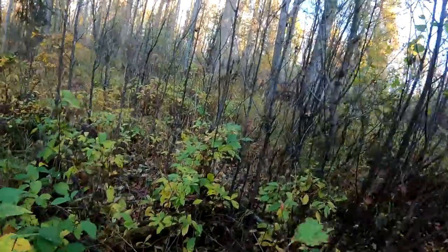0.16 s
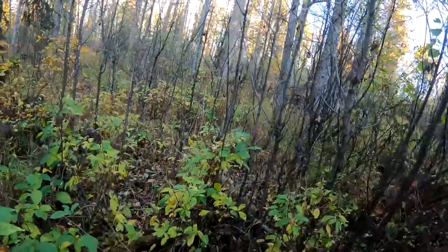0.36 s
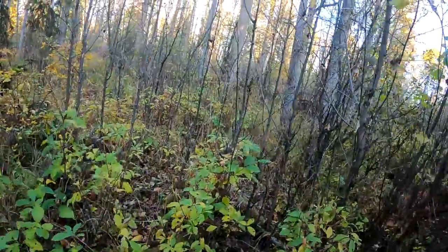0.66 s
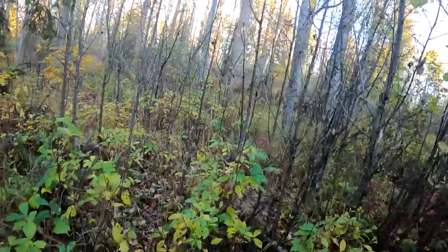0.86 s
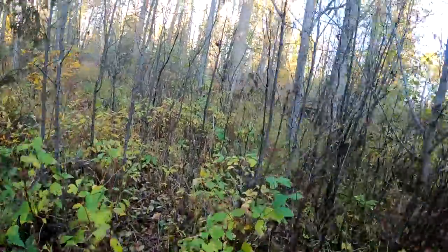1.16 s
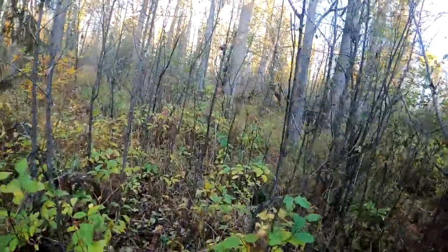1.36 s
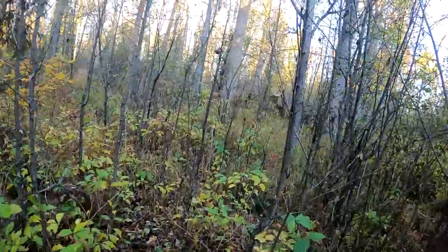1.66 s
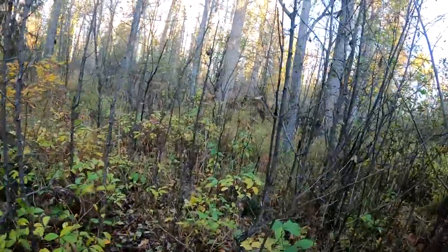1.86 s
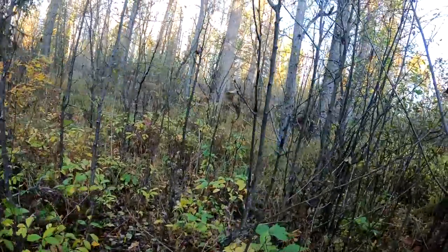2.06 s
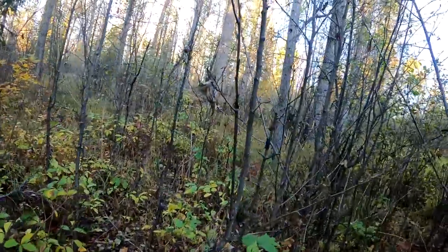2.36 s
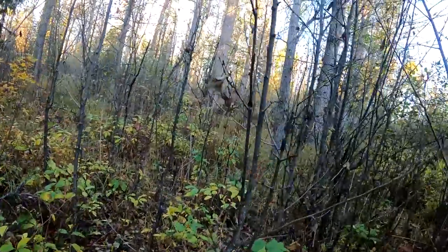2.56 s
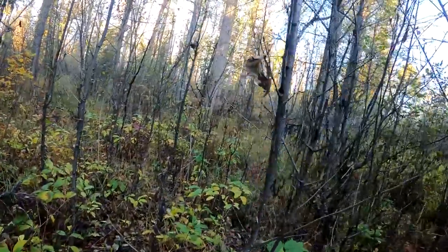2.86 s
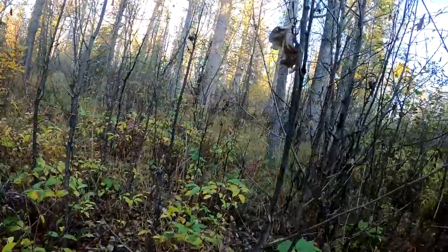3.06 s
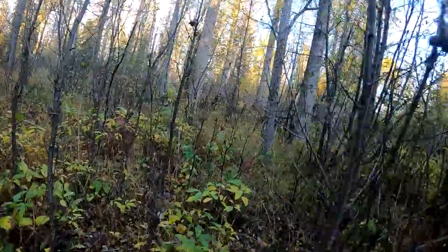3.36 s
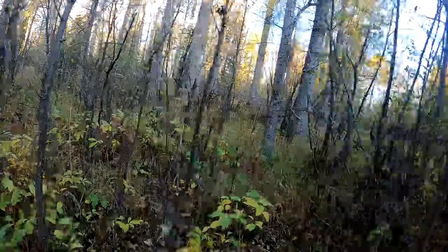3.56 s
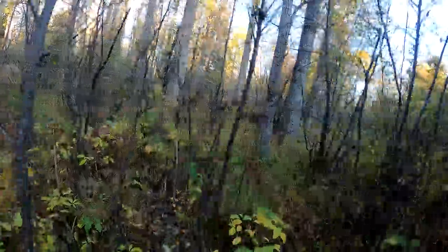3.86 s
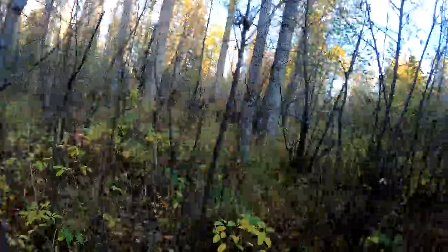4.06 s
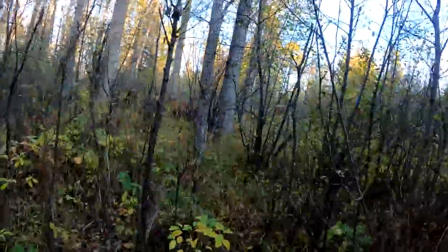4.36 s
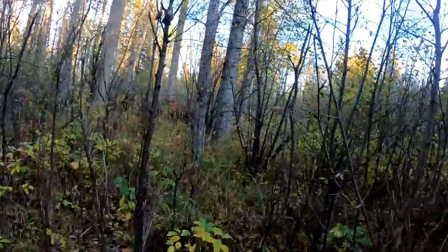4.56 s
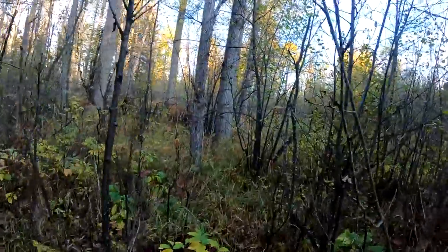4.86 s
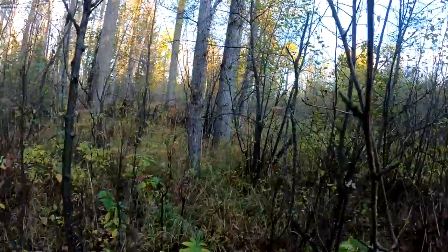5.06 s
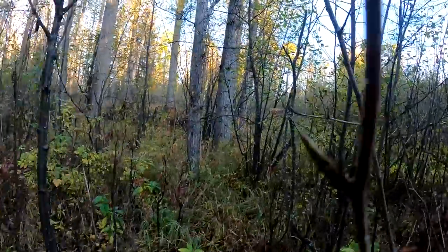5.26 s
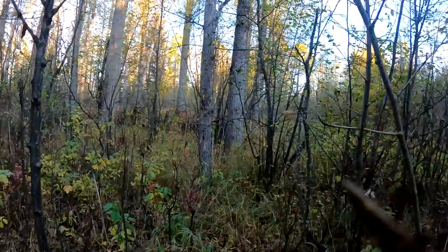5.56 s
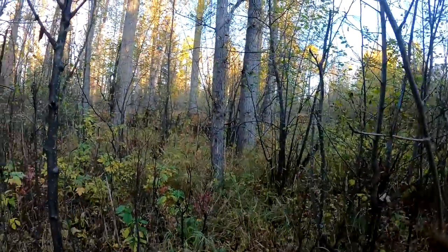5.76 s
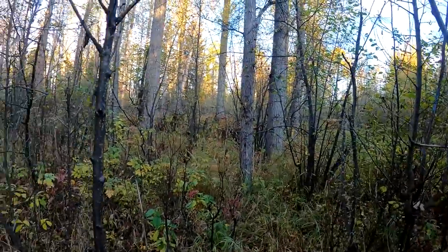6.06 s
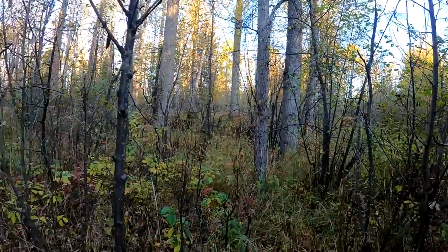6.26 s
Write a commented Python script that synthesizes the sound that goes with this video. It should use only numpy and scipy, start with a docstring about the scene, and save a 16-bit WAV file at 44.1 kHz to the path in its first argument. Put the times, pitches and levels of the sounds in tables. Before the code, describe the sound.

Someone wades slowly through dry autumn brush, leaves rustling and twigs snapping, then a close branch knocks sharply on the right and rattles the camera.

```python
"""Pushing through dry brush

Someone wades slowly through dense autumn brush, carrying the microphone on a camera. Noise grains make
the rustle of litter, stems and leaves; short bursts and ringing modes make snapping twigs, a ticking
stalk and groaning stems; sinking tones make feet thud on soft ground. Near the end a branch close on
the right knocks sharply, rubs past with a rough creak and leaves the camera mount rattling."""
import sys
import numpy as np
from scipy import signal
from scipy.io import wavfile
from scipy.ndimage import uniform_filter1d

SR = 44100
rng = np.random.default_rng(int(sys.argv[2]) if len(sys.argv) > 2 else 0)


def dump(signal):
    """Clip the signal to [-1, 1] and save it as 16-bit WAV at the path in sys.argv[1]."""
    limited = np.clip(np.atleast_2d(signal).T, -1, 1)
    pcm = np.round(limited * 32767).astype(np.int16)
    wavfile.write(sys.argv[1], SR, pcm)


N = 283210
TIME = np.arange(N) / SR
BAND_HZ = 28 * 2 ** (np.arange(19) / 2)  # half-octave centres

# knocks of the close branch: t/s, strength/dB, contact brightness f/Hz
KNOCKS = [(5.4123, -42, 2000), (5.4236, -12, 9050), (5.432, -45, 6100), (5.438, -31, 2500),
          (5.4806, -13.5, 3580), (5.489, -22, 1500), (5.521, -26, 1500)]
# rattles of the camera mount: t/s, strength/dB
RATTLES = [(5.6997, -30), (5.725, -43), (5.752, -35), (5.785, -42.5), (5.834, -37.5)]


def from_db(db):
    """Decibels to amplitude gain."""
    return 10 ** (np.asarray(db) / 20)


def rms_one(x):
    """Scale to unit power."""
    return x / np.sqrt(np.mean(x ** 2) + 1e-20)


def in_time(rows):
    """Each column of a curve at every sample."""
    s, *columns = np.transpose(rows)
    return [np.interp(TIME, s, column) for column in columns]


def at_hz(points, hz):
    """Read a spectrum on a log-frequency axis."""
    f, value = np.transpose(points)
    return np.interp(np.log(hz), np.log(f), value)


def filtered(x, hz, kind, order=2):
    """Causal Butterworth filter."""
    edges = np.clip(hz, 10, .45 * SR)
    return signal.sosfilt(signal.butter(order, edges, kind, fs=SR, output="sos"), x + 1e-18)


def band(x, hz, octaves=0.48, order=2):
    """Band-pass about a centre."""
    return filtered(x, [hz * 2 ** (-octaves / 2), hz * 2 ** (octaves / 2)], "band", order=order)


def drift(rate):
    """Random wander with spread 1, turning this many times a second."""
    points = rng.standard_normal(4096)
    return rms_one(np.interp(TIME * rate, np.arange(len(points)), points))


def panned(x, left_db):
    """Place a sound by the level of left over right."""
    return x * from_db(left_db * np.array([[.5], [-.5]]))


def stereo(pair, hz):
    """Mix two unrelated signals into left and right with the likeness usual at a frequency."""
    # likeness of the two channels: f/Hz, likeness [0..1]
    likeness = [(30, 0.51), (300, 0.96), (700, 0.89), (2000, 0.79), (5000, 0.8), (8000, 0.7), (13000, 0.24)]
    alike = np.clip(at_hz(likeness, hz), 0, 1)
    middle = np.sqrt(1 + alike) * pair[0]
    side = np.sqrt(1 - alike) * pair[1] * [[1], [-1]]
    return (middle + side) / np.sqrt(2)


def add(track, s, sound):
    """Mix a sound in at a time."""
    i = max(round(s * SR), 0)
    track[..., i:i + sound.shape[-1]] += sound[..., :N - i]


def ring(force, modes):
    """A unit click sets every mode ringing at its level; neighbours swing in opposite directions."""
    out = 0
    for k, (hz, db, t60) in enumerate(modes):
        r, w = from_db(-60 / (t60 * SR)), 2 * np.pi * hz / SR
        mode = signal.lfilter([0, np.sin(w)], [1, -2 * r * np.cos(w), r * r], force + 1e-18)
        out = out + (-1) ** k * from_db(db) * mode
    return out


def crackle(per_s, spread_db, grain_s, clump_db=6.0, clumps_per_s=45):
    """Power, mean 1, of many tiny fractures that come in clumps, each sudden and quickly dying."""
    born = rng.random(N) < per_s / SR * from_db(clump_db * drift(clumps_per_s))
    power = born * from_db(spread_db * np.minimum(rng.exponential(1, N), 3.5)) ** 2
    power = signal.lfilter([1], [1, -np.exp(-1 / (grain_s * SR))], power + 1e-18)
    return power / power.mean()


def evened(power, window_s, evenness):
    """Take the slow swells out of a track of power and keep its quick grain."""
    slow = uniform_filter1d(power, max(int(window_s * SR), 1))
    return power / (slow + 1e-6) ** np.clip(evenness, 0, 1)


def swell(track, s, hold_s, db, quickness=1):
    """Add to a track of power a movement that swells quickly up to s, holds and settles more slowly."""
    swell_db_per_s, settle_db_per_s = 328, 140.5  # at quickness 1
    t = TIME[:SR] - .25
    rise_db = np.minimum(swell_db_per_s * t, 0)
    fall_db = settle_db_per_s * np.maximum(t - hold_s, 0)
    shape_db = quickness * (rise_db - fall_db)
    out = track.copy()
    # whatever would come before time zero is left out
    add(out, s + t[0], (from_db(db) * from_db(shape_db[s + t >= 0])) ** 2)
    return out


def shaped(x, power):
    """Give a noisy sound the envelope and the energy of a track of power."""
    return x * np.sqrt(power * power.mean() / np.mean(power * x ** 2))


def thicket(x, near_db, far_db, near_t60=0.038, far_t60=0.16):
    """Ground and stems scatter the sound at once; trunks farther off return a faint tail."""
    t = TIME[:SR // 2]
    scatter = filtered(rng.standard_normal((2, len(t))), 13000, "low") * (t > .003)
    response = 0
    for db, t60 in (near_db, near_t60), (far_db, far_t60):
        tail = scatter * from_db(-60 * t / t60)
        response = response + from_db(db) * rms_one(tail) / np.sqrt(len(t))
    return x + signal.fftconvolve(x, response, axes=1)[:, :N]


def off_the_ground(x):
    """Narrow dips and peaks where direct and ground-reflected sound meet."""
    # hollows and lifts: f/Hz, level/dB, sharpness Q
    ground_colour = [(810, -5, 3.6), (985, 1.5, 6.4), (2270, -1.5, 2.9), (6100, -2.5, 2.7),
                     (7150, 1.5, 9.8), (8000, -3, 6.6)]
    for hz, db, q in ground_colour:
        x = x + (from_db(db) - 1) * signal.lfilter(*signal.iirpeak(hz, q, fs=SR), x)
    return x


def movement():
    """Levels in dB of trodden litter, scraping stems and dry leaves: the steady drag plus every sweep."""
    # steady drag of the body through the stems, following the walking effort: t/s, level/dB
    drag = [(0, -62), (.13, -76), (.36, -53.5), (1.02, -52), (1.25, -54), (1.52, -57.5), (1.8, -67.5),
            (2.03, -61), (2.3, -53.5), (2.6, -57.5), (2.99, -65.5), (3.2, -59.5), (3.55, -51),
            (4.25, -50.5), (4.54, -57), (4.9, -57.5), (5.3, -66.5), (5.95, -67.5), (6.2, -74),
            (6.42, -78.5)]
    # the litter falls quiet while a foot hangs in the air before a step: t/s, change of litter level/dB
    foot_lifted = [(.29, 2), (.35, -1.5), (1.8, 0.5), (2.06, -6.5), (2.4, 0), (2.88, 0.5), (2.97, -16),
                   (3.47, -5.5), (3.56, -10)]
    # a leg or arm sweeps through the brush: full swell t/s, hold/s, stems level/dB,
    # litter above stems/dB, dry leaves above stems/dB
    sweeps = [(0.005, 0.078, -61, -26, 15), (0.184, 0.078, -55, -8, 11), (0.332, 0.16, -52.5, 0, 5.5),
              (0.507, 0.083, -48, -6, -1), (0.64, 0.21, -55, -3, 5), (0.79, 0.13, -47, -7, -1.5),
              (0.924, 0.07, -51.5, -5.5, 9), (1.076, .025, -54, -15, 9.5), (1.123, 0.015, -52.5, 1, -14),
              (1.19, 0.064, -53, -5, 6), (1.66, 0.053, -56, -1.5, -0.5), (1.84, 0.084, -67, -1, 13.5),
              (2.115, 0.034, -58.5, -13, 8), (2.29, 0.1, -53.5, -28, -2.5), (2.705, 0.055, -48, 1, 4),
              (2.812, 0.12, -56, -5, 6), (3.047, 0.015, -56.5, -2, 0), (3.1, 0.14, -59.5, -30, 13),
              (3.26, 0.01, -53, -4, -1), (3.339, 0.038, -53, -6, 11), (3.45, 0.024, -51, -9, 5),
              (3.503, 0.024, -53.5, -5, 11), (3.541, 0.068, -51.5, 1, 12.5),
              (3.654, 0.098, -52, -0.5, 11.5), (3.81, 0.14, -50, 0.5, -2), (4.044, 0.12, -58, 5, -1),
              (4.217, 0.2, -57, 5, 9), (4.592, 0.021, -52, -6, -15), (4.657, 0.19, -55, -3, 5),
              (4.956, 0.068, -61.5, 2.5, 12.5), (5.26, 0.032, -73.5, -11, 20),
              (5.478, 0.034, -63.5, 5.5, 11.5), (5.604, 0.12, -60.5, -19, 0.5), (6.013, 0.018, -65, -8, 8),
              (6.092, 0.0076, -62.5, -9, 1.5)]
    # at the usual drag, litter and leaves lie this far above the stems
    usual_db, litter_above_db, leaves_above_db = -60, -3, 1.09 * 0 + 1.5
    # dB per dB of effort; trodden litter answers most steeply
    litter_follows, leaves_follows = 1.09, 0.68
    drag_db, = in_time(drag)
    lifted_db, = in_time(foot_lifted)
    effort_db = drag_db - usual_db
    litter_db = litter_above_db + litter_follows * effort_db + lifted_db
    leaves_db = leaves_above_db + leaves_follows * effort_db
    power = from_db(usual_db + np.array([litter_db, effort_db, leaves_db])) ** 2
    for s, hold_s, db, litter_db, leaves_db in sweeps:
        power = swell(power, s, hold_s, db + np.array([[litter_db], [0], [leaves_db]]))
    return 10 * np.log10(power)


def background(sway_db, rumble_hz=72, drone_hz=168, drone_db=-64.0, drone_octaves=0.58, waver_db=3.5):
    """Quiet air and a low wavering drone, with the rumble of the moving camera on top."""
    # still forest air: f/Hz, level/dB per half octave
    air_colour = [(25, -61.5), (55, -101.5), (95, -101.5), (160, -80.5), (250, -64.5), (340, -78),
                  (700, -109), (5000, -92), (14000, -104)]
    white, air = rng.standard_normal((2, 2, N)), 0
    for k, hz in enumerate(BAND_HZ):
        air = air + stereo(rms_one(band(white[k % 2], hz)), hz) * from_db(at_hz(air_colour, hz))
    hum = band(rng.standard_normal((2, N)), drone_hz, drone_octaves, order=3)
    drone = stereo(rms_one(hum), drone_hz) * from_db(drone_db + waver_db * drift(11))
    rumble = filtered(rng.standard_normal((2, N)), 20, "high")
    rumble = stereo(rms_one(filtered(rumble, rumble_hz, "low", order=3)), rumble_hz)
    return air + drone + rumble * from_db(sway_db)


def sway(litter_db, above_litter_db=-17, uneven_db=-1.0):
    """Level in dB of the faint handling rumble: it follows the tread unevenly."""
    return litter_db + above_litter_db + uneven_db * drift(23)


def lurches(octaves=1.37):
    """Each shift of weight shakes the camera in a low band of noise with its own centre."""
    # shifts of weight: full swell t/s, hold/s, rumble level/dB, centre f/Hz
    shifts = [(0.195, 0.1, -49, 14), (0.34, .08, -56, 53), (.58, 0.051, -62, 58), (0.996, .07, -54, 53),
              (1.1, 0.12, -55, 42), (2.2, 0.13, -62, 29), (2.703, .04, -49, 77), (2.82, 0.031, -50, 65),
              (2.923, 0.044, -59, 35), (3.587, .11, -48.5, 54), (3.727, .09, -50.5, 25),
              (3.895, 0.017, -47.5, 39), (4.27, 0.048, -54.5, 40), (5.458, 0.075, -51, 53),
              (5.712, .17, -52, 68)]
    out = 0
    for s, hold_s, db, hz in shifts:
        shake = stereo(band(rng.standard_normal((2, N)), hz, octaves), hz)
        out = out + shaped(shake, swell(np.zeros(N), s, hold_s, db, quickness=2.0))
    return out


def bumps():
    """All soft blows that reach the camera: the thuds and the jolts of knocks and rattles."""
    # heels, soles and bumps against the body: t/s, level/dB, starting f/Hz, settled f/Hz, t60/s
    blows = list([(.528, -34, 292, 80, .05), (.538, -29.5, 262, 160, 0.072), (.542, -30.5, 81, 63, 0.1),
                  (.961, -28.5, 230, 160, .07), (.968, -30, 99, 48, .1), (1.209, -41, 130, 40, .08),
                  (1.318, -46.5, 260, 190, 0.11), (2.921, -34.5, 190, 111, 0.059),
                  (3.284, -42, 70, 38.4, 0.19), (3.574, -34.5, 300, 90, 0.081),
                  (3.88, -32.5, 231, 50, 0.058), (4.928, -33.5, 417, 110, 0.047),
                  (5.499, -29.5, 272, 55, 0.049), (6.125, -43.5, 54, 50, 0.22)])
    # jolt of each hit: dB above the hit, starting Hz, settled Hz, t60 in s
    knock_jolt, rattle_jolt = (-20.5, 319, 52, 0.18), (-9.5, 240, 55, 0.13)
    for hits, (above_db, *wobble) in ((KNOCKS, knock_jolt), (RATTLES, rattle_jolt)):
        for s, db, *_ in hits:
            blows.append((s, db + above_db, *wobble))
    return blows


def thuds(settle_s=0.0092, rise_s=0.002, grit=0.3, crumble_db=-14, crumble_hz=340, crumble_t60=0.059):
    """A soft blow starts high and sinks to a slow wobble as the weight settles; the ground crumbles on."""
    out, t = np.zeros(N), TIME[:SR // 4]
    for s, db, start_hz, rest_hz, t60 in bumps():
        hz = rest_hz + (start_hz - rest_hz) * np.exp(-t / settle_s)
        wobble = np.sin(2 * np.pi * np.cumsum(hz) / SR)
        crunch = grit * rms_one(filtered(rng.standard_normal(len(t)), 2 * start_hz, "low"))
        push = (wobble + crunch) * from_db(-60 * t / t60)
        # the fifth power leaves a few large grains among many small ones
        crumbs = rms_one(band(rng.standard_normal(len(t)) ** 5, crumble_hz, 2.3))
        push += crumbs * from_db(crumble_db - 60 * t / crumble_t60)
        add(out, s, push * from_db(db) * (1 - np.exp(-t / rise_s)))
    return out


def mount():
    """The jolted camera mount chatters a few times, each click ringing its modes."""
    # what the mount rings with: f/Hz, level/dB, t60/s
    mount_modes = [(143, -7, 0.095), (715, -8, 0.051), (1480, -18, 0.024)]
    force = np.zeros(N)
    for s, db in RATTLES:
        add(force, s, from_db([db]))
    return ring(force, mount_modes)


def branch(splinter=0.029, splinter_s=0.0021, rub_low_hz=2200, bark_db=-5, creak_db=3.0,
           creak_follows=0.31, creak_jitter=0.075, creak_flutter_db=5):
    """Hard knocks and then the fine slips of rubbing bark drive the same wood modes."""
    # what the branch rings with: f/Hz, level/dB, t60/s
    branch_modes = [(1340, -2, 0.018), (1880, -3.5, 0.0073), (2470, -23, 0.034), (3260, -17, 0.0074),
                    (4160, -15.5, 0.014), (4850, -18.5, 0.008), (5340, -18, 0.005), (7000, -12.5, 0.0073)]
    # what the rubbed bark rings with: f/Hz, level/dB, t60/s
    bark_modes = [(4200, -2, 0.003), (7250, 4, 0.0056)]
    # bark rubbing past: t/s, level/dB
    rub_curve = [(5.57, -70), (5.608, -56), (5.62, -46), (5.637, -51.5), (5.645, -53), (5.676, -52),
                 (5.680, -41), (5.685, -38), (5.689, -62), (5.70, -77)]
    # pitch of the creak as the branch bends, before jitter: t/s, f/Hz
    creak_curve = [(5.6, 1420), (5.63, 1340), (5.66, 1432), (5.68, 1480)]
    force, t = np.zeros(N), TIME[:SR // 50]
    for s, db, bright_hz in KNOCKS:
        contact = (t == 0) + splinter * rng.standard_normal(len(t)) * np.exp(-t / splinter_s)
        add(force, s, from_db(db) * filtered(contact, bright_hz, "low", order=1))
    knocks = filtered(ring(force, branch_modes), 770, "high")
    slips = rng.standard_normal(N) * np.sqrt(crackle(per_s=1980, spread_db=5.5, grain_s=0.00072))
    rub = rms_one(ring(filtered(slips, rub_low_hz, "high", order=1), branch_modes))
    rub += from_db(bark_db) * rms_one(ring(slips, bark_modes))
    # the harder the rub, the more the slips lock into a rough creak near the lowest mode
    rub_db, = in_time(rub_curve)
    creak_hz = in_time(creak_curve)[0] * (1 + creak_jitter * drift(1100))
    locked_db = creak_db + creak_follows * (rub_db - rub_db.max()) + creak_flutter_db * drift(260)
    rub += from_db(locked_db) * np.sin(2 * np.pi * np.cumsum(creak_hz) / SR)
    rub /= np.sqrt(uniform_filter1d(rub ** 2, size=600))  # so the curve alone sets the level
    touching = (TIME > rub_curve[0][0]) & (TIME < rub_curve[-1][0])
    return filtered(knocks + rub * from_db(rub_db) * touching, 6800, "low", order=6)


def groans(slips_per_s=700):
    """Bent stems groan against each other: uneven slips of bark on bark ring a stem for a moment."""
    # groans: full swell t/s, hold/s, level/dB, pitch f/Hz, upper modes/dB
    groan_list = [(3.261, 0.008, -55, 478, -18), (3.358, 0.012, -53, 550, -13),
                  (3.485, 0.014, -51, 520, -25), (3.513, .002, -40, 574, -22), (3.55, 0.01, -48, 533, -19),
                  (6.008, 0.027, -61.5, 794, 3), (6.037, 0.0094, -61.5, 810, -14),
                  (6.108, 0.0066, -54.5, 790, 8)]
    # what a groaning stem rings with: multiple of its pitch, level/dB, t60/s
    stem_modes = [(1, -2, 0.025), (1.9, 0, .014), (2.5, -1, .012), (3.25, 2, .01)]
    out = 0
    slips = rng.standard_normal(N) * np.sqrt(crackle(per_s=slips_per_s, spread_db=2.0, grain_s=0.00018))
    for s, hold_s, db, hz, upper_db in groan_list:
        modes = [(hz * multiple, mode_db + upper_db * (multiple > 1), t60)
                 for multiple, mode_db, t60 in stem_modes]
        envelope = swell(np.zeros(N), s, hold_s, db, quickness=5.6)
        out = out + shaped(ring(slips, modes), envelope)
    return out


def stalk(level_db=2.5, slip_s=0.00092, click=0.85):
    """Each slip of a bent dry stalk is a tiny sharp scuff that rings briefly at its own pitch."""
    # the stalk catching and letting go: t/s, peak level/dB before level_db is added, pitch f/Hz
    ticks = [(3.853, -38, 3700), (3.8694, -33, 3500), (3.881, -34, 3270), (3.9168, -32, 3400),
             (3.942, -27, 3280), (3.9557, -36, 3400), (3.970, -38, 3600), (3.99, -47, 3530),
             (4.0094, -30, 3420), (4.064, -33.5, 3150), (4.126, -39.5, 3330), (4.160, -43, 3580),
             (4.171, -42, 3540), (4.212, -35.5, 3300), (4.252, -40, 3660), (4.27, -33, 3000)]
    # what the stalk rings with: multiple of its pitch, level/dB, t60/s
    stalk_modes = [(.62, -7, 0.007), (1, 7, 0.0075), (1.38, -4.5, .003), (1.6, -10, 0.0037)]
    out, t = np.zeros(N), TIME[:SR // 25]
    for s, db, hz in ticks:
        scuff = rng.standard_normal(len(t)) * np.exp(-t / slip_s)
        modes = [(hz * multiple, mode_db, t60) for multiple, mode_db, t60 in stalk_modes]
        tick = click * scuff + ring(scuff, modes)
        add(out, s, from_db(db + level_db) * tick / np.abs(tick).max())
    return out


def snaps(break_s=0.000098, top_hz=7800, top_ratio=2.38, wood_share=0.73, dead_octaves=1.35, cycles=9):
    """A twig breaks at once, its fibres tear on in a band of noise and the broken piece may ring; scuffs and
    crumbling ground sound as wide, dull cracks."""
    # the loudest twigs, with a few scuffs of feet and crumbling ground: t/s, level/dB over the first 6 ms,
    # centre f/Hz, width/octaves, t60/s of the tearing
    twigs = [(0.081, -45.5, 3030, 0.35, 0.022), (.152, -46, 3850, 2.5, 0.037),
             (0.1814, -49.5, 1700, 0.4, 0.027), (.2203, -61, 5000, 3, .002),
             (0.2313, -55, 4200, 0.61, .003), (.243, -43, 3300, 0.59, 0.0074),
             (0.304, -36.5, 7000, 0.94, 0.022), (0.3464, -44, 650, 1.2, 0.013),
             (0.428, -51, 1120, 0.85, 0.017), (.433, -46, 330, 1, .05), (0.467, -48, 890, 0.81, 0.011),
             (0.501, -44.5, 1300, 4.3, 0.022), (0.525, -43, 600, 0.33, 0.049),
             (0.5368, -33.5, 580, 0.6, 0.02), (0.54, -36.5, 1800, 0.91, 0.03), (.549, -47, 700, 2.4, 0.013),
             (.561, -44, 1400, 1.2, 0.023), (0.5978, -41.5, 1430, 0.79, 0.03),
             (.637, -45, 950, 1.15, 0.023), (0.7396, -40, 4600, 0.6, 0.018), (0.752, -43, 1190, 1, .03),
             (.778, -43.5, 2020, 3, .008), (0.8042, -34, 1500, 3.3, 0.032), (0.833, -38, 2880, 0.93, 0.054),
             (.857, -43, 300, 1.1, 0.063), (0.8582, -34, 715, 0.94, 0.043), (0.873, -36.5, 890, 1.8, 0.022),
             (0.893, -48, 4800, 0.91, .006), (0.937, -43, 220, 1.4, 0.05),
             (0.955, -44.5, 3830, 0.42, 0.0077), (1.074, -46, 5200, 0.73, 0.0099),
             (1.0844, -41, 1480, 3.4, 0.039), (1.125, -47, 1370, 2.2, 0.025), (1.14, -42.5, 1500, 2.1, .02),
             (1.2044, -31, 4770, 2.7, 0.009), (1.207, -39.5, 4000, 3, 0.059),
             (1.226, -43.5, 4270, 0.49, 0.0083), (1.6331, -45, 1050, 0.87, 0.039),
             (1.668, -47, 1360, 0.69, .05), (1.774, -53, 3280, 0.31, 0.0072),
             (1.780, -51, 3960, 0.64, 0.0054), (1.8424, -48.5, 1880, 6, 0.048),
             (1.9912, -48, 2950, 1.3, 0.042), (2.15, -49, 2500, 4.5, 0.022),
             (2.436, -46.5, 1200, 2.7, 0.02), (2.4874, -44.5, 2210, 3.2, 0.028),
             (2.496, -50, 600, 0.65, 0.04), (2.753, -41, 5800, 0.94, 0.024),
             (2.919, -32.5, 5900, 1.5, 0.023), (3.142, -46.5, 4730, .8, 0.016),
             (3.266, -41.5, 3000, 3.5, 0.051), (3.2744, -40.5, 2500, 7, 0.029),
             (3.5453, -43, 1500, 1.5, 0.0084), (3.574, -39, 650, 1.1, .005),
             (3.5943, -39.5, 4500, 2.2, 0.011), (3.665, -41, 2480, 2.1, 0.0051),
             (3.68, -37, 2700, 0.76, 0.028), (3.7313, -33.5, 3870, 0.24, 0.013),
             (3.7313, -33, 2800, 0.42, 0.023), (3.732, -36.5, 900, 0.32, 0.034),
             (3.7321, -38.5, 1550, 0.36, 0.02), (3.773, -41.5, 2800, 1.3, .03),
             (3.8266, -32, 4900, 0.7, 0.0077), (3.8317, -36.5, 3200, 0.75, 0.011),
             (3.8478, -43, 3900, 0.94, .004), (4.0054, -37.5, 3570, 3.7, 0.014),
             (4.036, -41.5, 3400, 0.9, 0.016), (4.191, -41, 4850, 5.6, 0.051),
             (4.224, -48, 5500, 1.8, .002), (4.27, -38.5, 4300, 3.8, 0.014),
             (4.6062, -38.5, 2820, 0.56, 0.022), (4.895, -34, 4600, 2.4, 0.016),
             (4.9257, -36, 3900, 0.93, 0.0073), (4.9257, -28.5, 1130, 0.7, 0.007),
             (4.9727, -36, 3300, 3.2, 0.013), (4.9726, -33.5, 620, 1.4, 0.013),
             (5.013, -32.5, 1190, 2.8, 0.018), (5.3739, -56, 3340, 0.69, 0.025),
             (5.454, -46, 730, 0.94, 0.042), (5.499, -39.5, 616, 1.4, 0.068),
             (5.6997, -39.5, 930, 3.3, 0.019), (5.918, -57.5, 3900, 1.2, .025),
             (6.027, -51.5, 7300, 0.96, 0.057), (6.239, -66, 5870, 0.64, .02)]
    out, t = np.zeros((2, N)), TIME[:SR // 20]
    head = t < .006
    for s, db, hz, octaves, t60 in twigs:
        fibres = from_db(-60 * t / t60) + np.exp(-t / break_s)
        crack = band(rng.standard_normal((2, len(t))) * fibres, hz, octaves, order=1)
        crack = filtered(crack, max(top_hz, top_ratio * hz), "low", order=3)
        crack /= np.sqrt(np.mean(crack[:, head] ** 2, axis=1, keepdims=True))
        wood = np.sin(2 * np.pi * hz * t) * from_db(-60 * t / max(cycles / hz, t60 / 2))
        wood /= np.sqrt(np.mean(wood[head] ** 2))
        # clean breaks ring, wide crunches do not
        ringing = np.clip(wood_share * (1 - octaves / dead_octaves), 0, 1)
        snap = np.sqrt(1 - ringing) * stereo(crack, hz) + np.sqrt(ringing) * wood
        add(out, s, from_db(db) * snap / np.sqrt(np.mean(snap[:, head] ** 2)))
    return out


def crunches(litter_db, per_s=24, level_db=4.0, spread_db=4.5, hz=700, octaves=2.6, t60=0.016):
    """Small sticks give way under the litter at random, each a short dull crack."""
    born = rng.random(N) < per_s / SR
    size_db = spread_db * (np.minimum(rng.exponential(1, N), 3) - 1)
    size = born * from_db(litter_db + level_db + size_db)
    fibres = signal.lfilter([1], [1, -from_db(-60 / (t60 * SR))], size + 1e-18)
    return fibres * rms_one(band(rng.standard_normal(N), hz, octaves))


def leaf_ticks(stems_db, leaves_db, per_s=210, level_db=6.0, spread_db=2.0, cycles=8,
               low_hz=1100, high_hz=9000, click=1.07, count=40):
    """Single brittle leaves and stalks crack out of the rustle, each a sharp click with a brief pitch."""
    at = np.flatnonzero(rng.random(N) < per_s / SR)
    size_db = spread_db * np.minimum(rng.exponential(1, N), 3)
    piece, out = rng.integers(0, count, N), 0
    for k, hz in enumerate(np.geomspace(low_hz, high_hz, count)):
        own, force = at[piece[at] == k], np.zeros(N)
        light = at_hz([(1900, 0), (4500, 0.77)], hz)  # high pitches follow the leaves, low ones the stems
        follow_db = light * leaves_db[own] + (1 - light) * stems_db[own]
        force[own] = from_db(level_db + size_db[own] + follow_db)
        tick = click * force + ring(force, [(hz, 0, cycles / hz)])
        out = out + panned(tick, left_db=rng.normal(0, 5.6))  # each pitch has its own place
    return filtered(out, 630, "high")


def rustle(litter_db, stems_db, leaves_db, shared=0.44, own=0.33, patchy_db=1.38):
    """Leaves slide and fracture: broad cracks span all bands, small flakes sound in one."""
    # colour of the rustle about its three levels: f/Hz, level/dB per half octave
    leaf_colour = [(150, -9.5), (280, -7.5), (450, -7), (800, -6), (1200, -7), (1800, -5), (2600, -6),
                   (3600, -6.5), (5000, -5.5), (7200, -7), (10000, -12.5), (14000, -11.5)]
    cracks = evened(crackle(per_s=470, spread_db=5.0, grain_s=0.004), window_s=0.06, evenness=1.0)
    white, out = rng.standard_normal((2, 2, N)), 0
    for k, hz in enumerate(BAND_HZ[BAND_HZ > 140]):
        # litter weighs most in the low bands, dry leaves in the high ones
        heavy = at_hz([(780, 0.92), (1200, 0.049)], hz)
        light = at_hz([(1900, 0.016), (4500, 0.55)], hz)
        level_db = heavy * litter_db + light * leaves_db + (1 - heavy - light) * stems_db
        flakes = crackle(per_s=450, spread_db=3.0, grain_s=0.0033)
        power = shared * cracks + own * flakes + max(1 - shared - own, 0)  # the rest is steady sliding
        grains = rms_one(band(white[k % 2] * np.sqrt(power), hz))
        colour_db = at_hz(leaf_colour, hz) + patchy_db * drift(30)
        out = out + stereo(grains, hz) * from_db(level_db + colour_db)
    return out


def scene():
    """The brush lies mostly to the left; the branch passes close on the right."""
    # where the disturbed brush lies: t/s, left over right level/dB
    bearing = [(0, 3), (.9, 2), (1.2, 6), (2, 3), (5.05, 1.5), (5.7, 4), (6.42, 3)]
    bearing_db, = in_time(bearing)
    litter_db, stems_db, leaves_db = movement()
    handling = thuds() + lurches() + background(sway(litter_db))
    close = thicket(panned(branch() + mount(), left_db=-8.5), near_db=-19, far_db=-34.0)
    cracks = snaps() + stalk() + groans() + crunches(litter_db) + leaf_ticks(stems_db, leaves_db)
    twigs = thicket(panned(cracks, left_db=bearing_db), near_db=-22.5, far_db=-17.5)
    brush = off_the_ground(panned(rustle(litter_db, stems_db, leaves_db), left_db=bearing_db))
    return brush + twigs + close + panned(handling, left_db=-3.0)


def record(dry):
    """The microphone fades above 10.88 kHz, then the top is cut steeply at 15.7 kHz."""
    soft = filtered(dry, 10880, "low", order=4)
    return signal.sosfilt(signal.ellip(10, .1, 80, 15700, fs=SR, output="sos"), soft)


dry = scene()
out = record(dry)
dump(out)
```